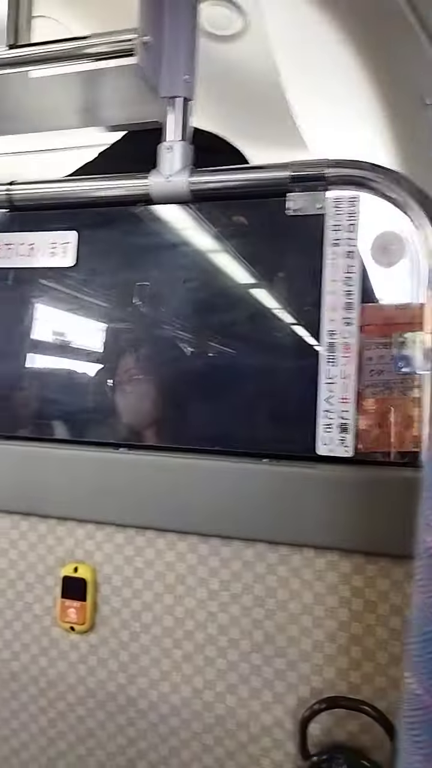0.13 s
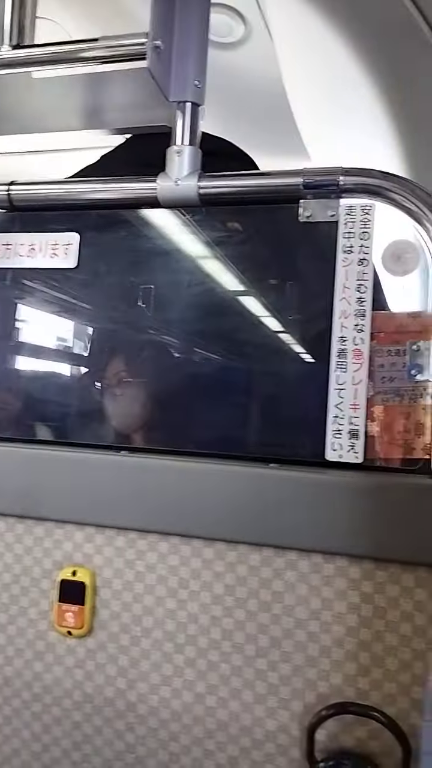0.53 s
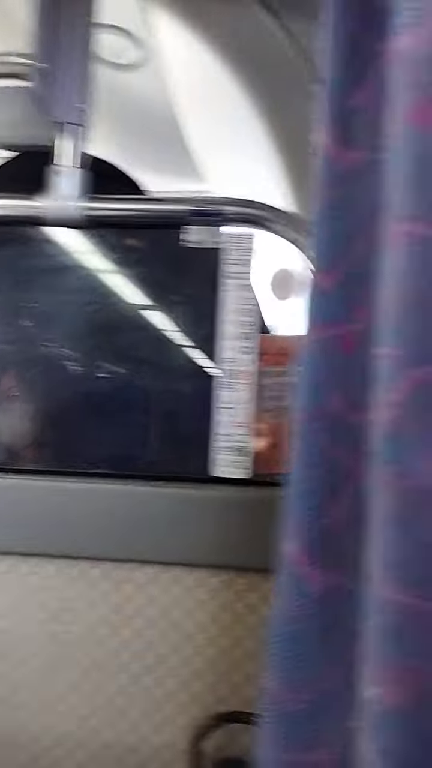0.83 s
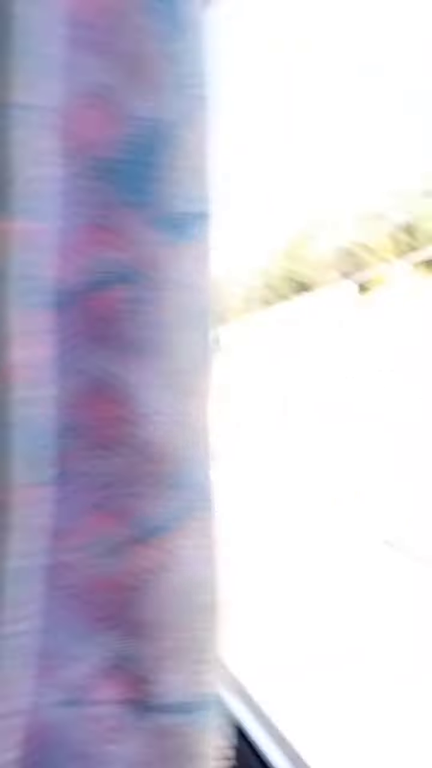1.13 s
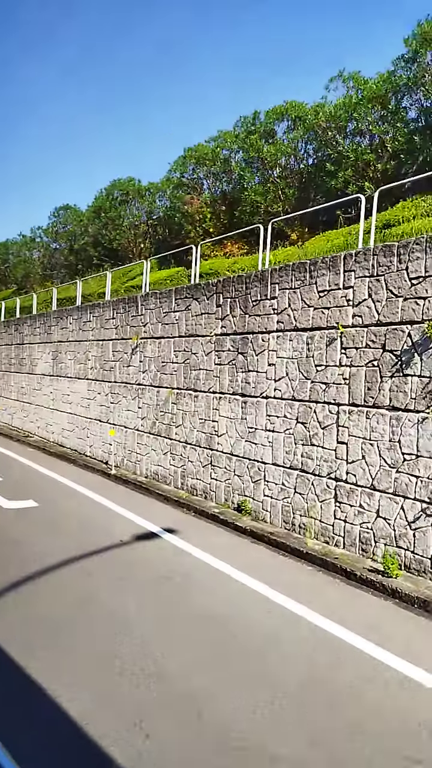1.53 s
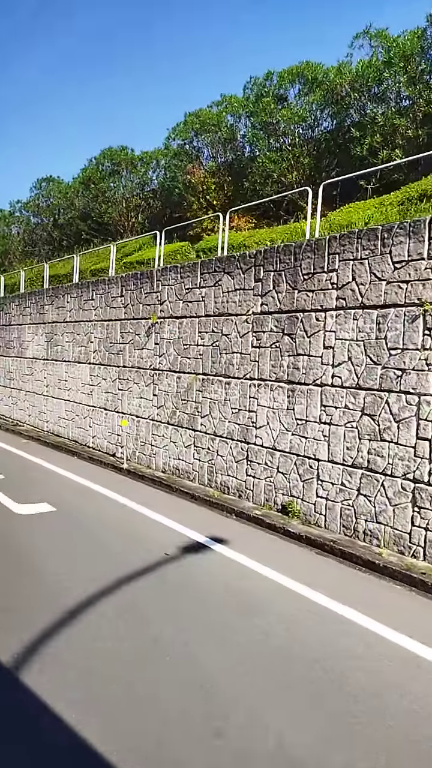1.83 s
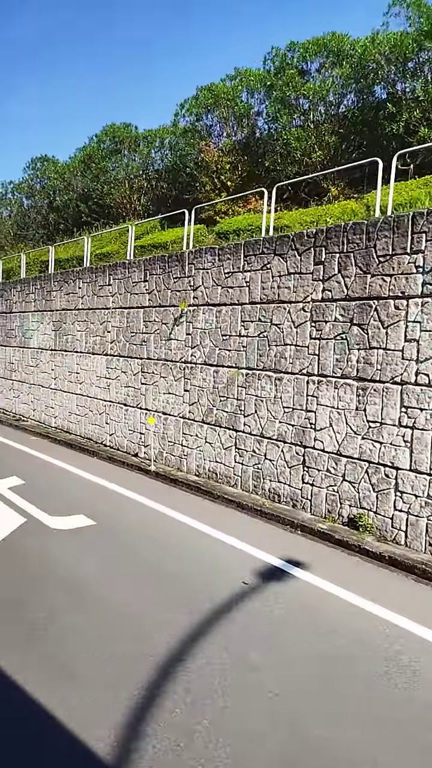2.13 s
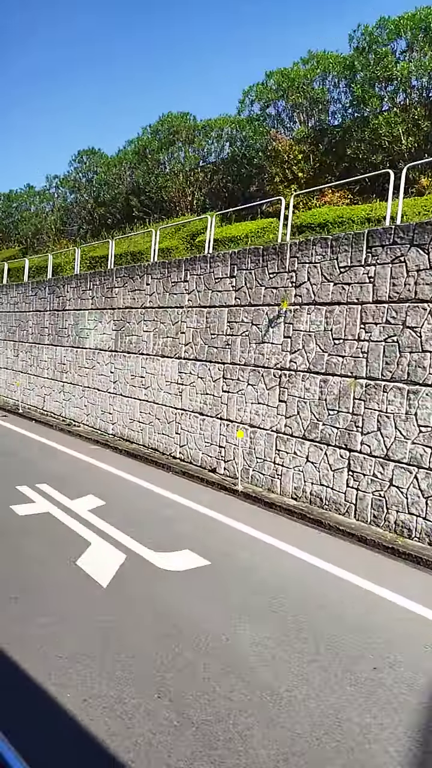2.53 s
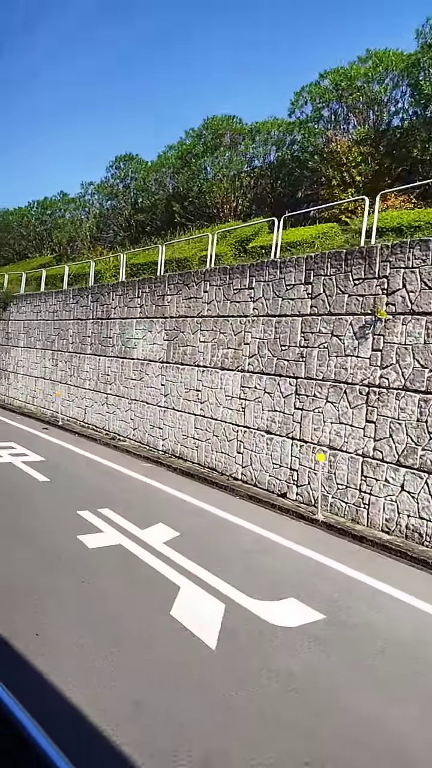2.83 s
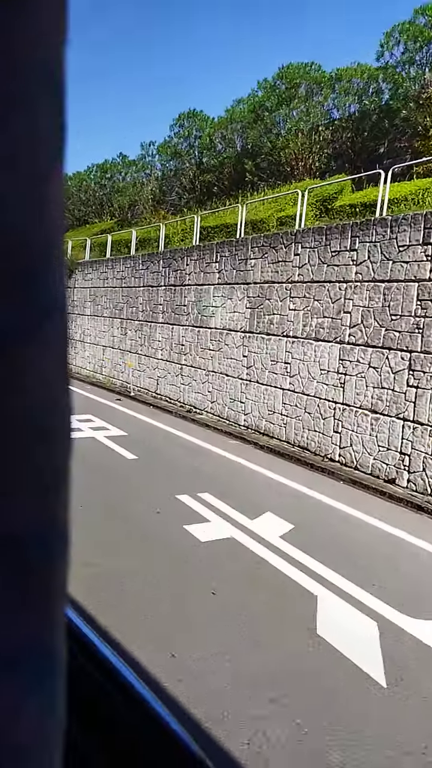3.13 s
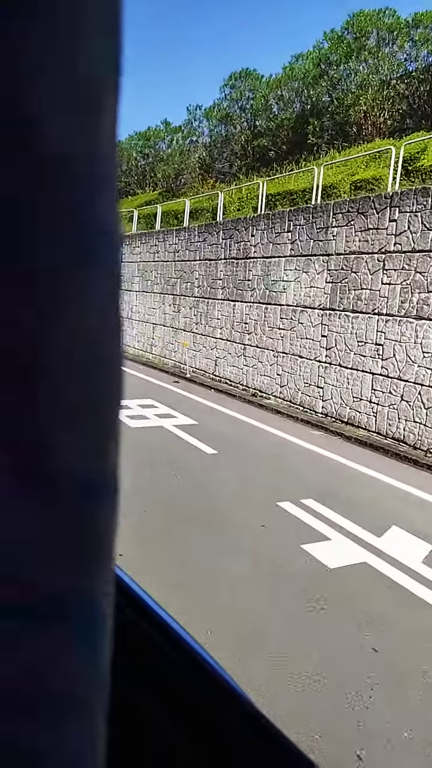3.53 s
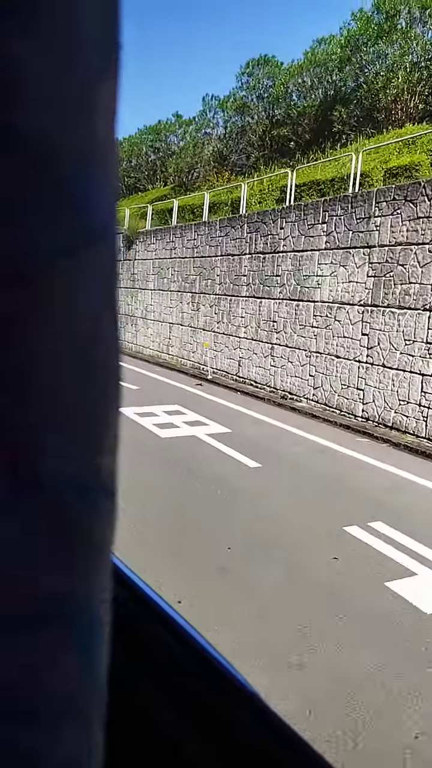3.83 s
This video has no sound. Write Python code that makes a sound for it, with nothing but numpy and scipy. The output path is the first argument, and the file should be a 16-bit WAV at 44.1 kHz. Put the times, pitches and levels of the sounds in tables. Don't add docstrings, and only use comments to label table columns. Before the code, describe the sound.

A bus engine and road noise rumble inside the cabin, heard from a seat; heavy low shudder and trim rattles cluster early, then fewer dry ticks, with a faint regular relay tick throughout.

```python
import sys
import numpy as np
from scipy import signal
from scipy.fft import rfft, irfft
from scipy.io import wavfile
from scipy.ndimage import uniform_filter1d, minimum_filter1d

SR = 44100
rng = np.random.default_rng(int(sys.argv[2]) if len(sys.argv) > 2 else 0)


def amp(db):
    return 10 ** (np.asarray(db, float) / 20)


def write(x):
    x = np.atleast_2d(x).T
    wavfile.write(sys.argv[1], SR, np.round(np.clip(x, -1, 1) * 32767).astype(np.int16))


N = 176400


def evened(x):
    return x / np.sqrt(np.mean(x ** 2) + 1e-20)


def read(points, hz):
    f, value = np.transpose(points)
    return np.interp(np.log(hz + 1), np.log(f + 1), value)


def curve(rows, t):
    s, db = np.transpose(rows)
    return np.interp(t, s, db)


def slow(rate_hz):
    f = np.fft.rfftfreq(N, 1 / SR)
    return evened(irfft(rfft(rng.standard_normal(N)) * np.exp(-(f / rate_hz) ** 2), N))


def coloured(x, colour, top_db=0.):
    hz = np.fft.rfftfreq(256, 1 / SR)
    treble_db = top_db * np.clip((hz - 9500) / 2000, 0, 1)
    taps = np.roll(irfft(amp(read(colour, hz) + treble_db)), 128) * np.hanning(256)
    return signal.oaconvolve(x, taps[None], "same", axes=1)


def cabin(x):
    t, t60_s = np.arange(6000) / SR, .06
    sparse = rng.standard_normal((2, 6000)) * (rng.random((2, 6000)) < .05)
    taps = sparse * amp(-60 * t / t60_s) * (t > .002)
    taps = taps / np.linalg.norm(taps, axis=1, keepdims=True)
    return signal.fftconvolve(x, taps, axes=1)[:, :N]


def ring(modes, detune, rise_s=0.000079):
    t = np.arange(3000) / SR
    total = np.zeros(3000)
    for (hz, db, t60_s), shift in zip(modes, detune):
        total += amp(db - 60 * t / t60_s) * np.sin(2 * np.pi * hz * (1 + shift) * t)
    return np.minimum(t / rise_s, 1) * total


# (start_s, level_db)
ROAD_LOAD = [
    (0.05, -31),
    (0.16, -32),
    (3.95, -35),
]
# (pitch_hz, share 0-1)
PORT_COHERENCE = [(20, 0.92), (60, 1), (130, 0.97), (290, 0.94), (600, 0.1), (1400, 0.18), (4000, 0.42),
                  (15000, 0.3)]


def ports(colour_db, size, patchy_db, flicker_db, load):
    hop = size // 4
    frames, hz = N // hop + 5, np.fft.rfftfreq(size, 1 / SR)
    a, b, c, d, patch = rng.standard_normal((frames, len(hz), 5)).T
    patch = evened(uniform_filter1d(uniform_filter1d(patch, size=8, axis=0), size=10, axis=1))
    flicker = evened(uniform_filter1d(rng.standard_normal(frames), size=6))
    load_db = curve(ROAD_LOAD, np.arange(frames) * hop / SR)
    load_db = load * (load_db - load_db.mean())
    same = np.clip(read(PORT_COHERENCE, hz), 0, 1)[:, None]
    late = np.exp(-2j * np.pi * hz * 0.0003 * hz / (hz + 250))[:, None]
    right = a + 1j * b
    left = same * late * right + np.sqrt(1 - same ** 2) * (c + 1j * d)
    gain_db = colour_db(hz)[:, None] + patchy_db * patch + flicker_db * flicker + load_db
    z = np.array([left, right]) * amp(gain_db)
    return evened(signal.istft(z, nperseg=size, noverlap=size - hop)[1][:, :N])


# (pitch_hz, level_db per Hz)
HISS_SPECTRUM = [(240, -30.5), (400, -18.5), (757, -14), (1210, -4), (4120, -20.5), (7440, -26),
                 (8420, -33), (15200, -35), (16400, -53)]


def hiss():
    def colour_db(hz):
        glass_db = 3 / (1 + ((hz - 2150) / 300) ** 2)
        return read(HISS_SPECTRUM, hz) + glass_db - 40 * (hz < 420)
    return amp(-49.5) * ports(colour_db, size=512, patchy_db=1.36, flicker_db=.7, load=0.51)


# (pitch_hz, level_db per Hz)
DRONE_SPECTRUM = [(25, -0.5), (46, -7.5), (100, -9.5), (200, -19.5), (260, -24), (450, -29), (700, -34.5),
                  (1500, -46)]
# (pitch_hz, width_hz, lift_db)
PANEL_BOOMS = [
    (30.8, 7.2, 0),
    (60.7, 2.2, 17),
    (75.8, 20.6, 6.5),
    (127.5, 7.4, 2.5),
    (167, 33.6, 6),
    (288.6, 15.8, 8),
    (322.4, 11.3, 5),
    (594, 11, 3.5),
]


def drone():
    def colour_db(hz):
        lift_db = sum(db / (1 + ((hz - f) / (width / 2)) ** 2) for f, width, db in PANEL_BOOMS)
        return read(DRONE_SPECTRUM, hz) + lift_db - 60 * (hz < 18) - 40 * (hz > 2000)
    return amp(-26.5) * ports(colour_db, size=4096, patchy_db=1.5, flicker_db=0.86, load=0.95)


# (start_s, level_db)
CHATTER_LEVEL = [(.05, -57.5), (.4, -56), (.9, -64), (1.15, -66), (1.35, -55.5), (1.62, -60.5), (1.78, -77),
                 (2.5, -76), (2.65, -56.5), (2.85, -57.5), (3.1, -57.5), (3.28, -62.5), (3.42, -70),
                 (3.8, -78), (3.9, -55.5), (3.98, -63)]
# (pitch_hz, level_db per Hz)
RUSTLE_SPECTRUM = [(2000, -17), (4000, -4), (6000, -1), (7200, 1), (8200, -6.5), (11000, -6.5), (15500, -6)]


def chatter():
    contacts_per_s, spread_db = 2500, 4
    size = amp(spread_db * np.minimum(rng.exponential(1, (2, N)), 5))
    size = size * (rng.random((2, N)) < contacts_per_s / SR)
    size = size * rng.choice([-1., 1.], (2, N))
    crossed = .5 * np.roll(size[::-1], 17, axis=1)
    rustle = coloured(size + crossed, RUSTLE_SPECTRUM)
    rustle = rustle + cabin(rustle)
    level_db = curve(CHATTER_LEVEL, np.arange(N) / SR) + 0.5
    return evened(rustle) * amp(level_db + 2.5 * slow(rate_hz=18))


# (pitch_hz, level_db, t60_s)
CLOSING_MODES = [(2070, -57, .05), (3070, -68, .04), (2160, -59, .04)]
# (pitch_hz, level_db, t60_s)
OPENING_MODES = [(2070, -55, .05), (840, -55, .06), (2140, -59, .04)]
RELAY_STRENGTH = [14, 18, 19, 19, 18, 19, 14, 18, 12, 14]


def relay():
    first_s, every_s = .208, .4015
    out = np.zeros(N + 3000)
    for k, luck in enumerate(rng.random((10, 4))):
        at = round((first_s + k * every_s) * SR)
        modes = (CLOSING_MODES, OPENING_MODES)[k % 2]
        tick = ring(modes, 0.0041 * (luck[:3] - .5), rise_s=.005)
        out[at:at + 3000] += amp(RELAY_STRENGTH[k]) * tick
    return np.array([np.roll(out, 14), out])[:, :N]


# (pitch_hz, level_db, t60_s)
TRIM_MODES = [(6900, -25, .05), (7250, -26, .04)]


def knocks(rows, colour, snap_s, ring_db, bright_db, scuff_db):
    out, t = np.zeros((2, N + 6000)), np.arange(400) / SR
    luck, grit = rng.random((len(rows), 3)), rng.standard_normal((len(rows), 400))
    decay = np.exp(-t / snap_s) + amp(scuff_db) * np.exp(-t / .0035)
    for (s, db, top_db, pan_db), u, g in zip(rows, luck, grit):
        burst = np.pad(g * decay, (150, 2450))
        click = coloured(burst[None], colour, top_db + bright_db)[0]
        click = click / np.sqrt(2 * uniform_filter1d(click ** 2, size=30).max())
        tone = np.roll(ring(TRIM_MODES, 0.08 * (u[:2] - .5), 0.00046), 150)
        hit = click + amp(ring_db + 8 * (u[2] - .5)) * tone
        for ear, lag, side in ((0, 8, 1), (1, -8, -1)):
            k = round(s * SR) + lag - 150
            out[ear, k:k + len(hit)] += amp(db + 4 + side * pan_db / 2) * hit
    return out[:, :N]


# (start_s, peak_db, treble_db, left_right_db)
DRY_TICKS = [(1.614, -54, -10, 0), (1.6156, -54, -12, -3), (1.8141, -36, -7, -10), (2.0164, -48, -7, -7),
             (2.0856, -45, -5, -12), (2.8004, -40, -8, -3), (2.805, -52, -7, 2), (2.8112, -52, -10, 5),
             (2.8872, -51, -13, 13), (2.8906, -51, -7, 10), (2.8942, -49, -10, 5), (2.9304, -50, -9, 11),
             (2.9377, -50, -14, 8), (2.992, -50, -8, 9), (3.0044, -50, -9, 10), (3.0569, -43, -14, -8),
             (3.1846, -52, -6, 9), (3.1902, -52, -4, 10), (3.1961, -44, -9, 13), (3.2039, -46, -12, 13),
             (3.2541, -51, -10, 9), (3.2638, -50, -13, 9), (3.2956, -53, -18, 15), (3.6188, -49, -10, -5),
             (3.8736, -46, -10, 5), (3.877, -49, -6, 2), (3.917, -52, -9, 5), (3.9274, -54, -4, 4),
             (3.9349, -54, -6, 3)]
# (pitch_hz, level_db per Hz)
TICK_SPECTRUM = [(2000, -20), (4300, -9), (5500, -8), (6900, 0), (8500, -6), (12000, -9), (16000, -11)]


def ticks():
    return knocks(DRY_TICKS, TICK_SPECTRUM, snap_s=.0002, ring_db=0., bright_db=6, scuff_db=-17)


# (start_s, peak_db, treble_db, left_right_db)
TRIM_RATTLES = [(0.0037, -44, -8, 18), (0.0481, -40, -18, -8), (0.0535, -32, -3, -11),
                (0.0971, -36, -8, -8), (0.1003, -42, -4, -9), (0.1038, -39, -7, -12),
                (0.1091, -42, -7, -10), (0.1107, -48, -16, 0), (0.1189, -48, -12, -7),
                (0.1211, -49, -10, -3), (0.1262, -49, -10, -8), (0.1314, -50, -10, -5),
                (0.2088, -49, -8, -1), (0.2121, -34, -14, -4), (0.2614, -39, -7, -5), (0.264, -41, -9, -7),
                (0.2677, -47, -11, -7), (0.3112, -39, -9, -11), (0.3582, -46, -11, -6),
                (0.3616, -35, -8, -6), (0.39, -50, -8, -6), (0.4539, -38, -8, -2), (0.5798, -46, -9, 2),
                (0.5829, -51, -11, 2), (0.588, -38, -18, -6), (0.5897, -45, -14, -5),
                (0.5929, -45, -11, -8), (0.7419, -47, -4, -9), (0.7464, -36, -8, -7), (0.7518, -46, -11, 2),
                (0.7547, -47, -9, -3), (0.7593, -42, -15, -3), (1.0499, -56, -12, 1),
                (1.0536, -54, -15, -3), (1.0597, -53, -12, -3), (1.1224, -43, -16, -5),
                (1.2336, -53, -11, -4), (1.2485, -49, -8, -5), (1.2525, -42, -13, -6),
                (1.2546, -38, -12, -7), (1.2568, -42, -11, -10), (1.2586, -43, -11, -6),
                (1.2617, -47, -9, -3), (1.2657, -47, -10, -8), (1.2711, -45, -10, -4),
                (1.2777, -49, -13, -8), (1.3197, -45, -13, -3), (1.3248, -38, -16, -8),
                (1.3583, -49, -10, 1), (1.3706, -49, -17, -5)]
# (pitch_hz, level_db per Hz)
KNOCK_SPECTRUM = [(1500, -28), (3600, -5), (5300, -9), (6900, -1), (8300, -7), (10500, -14), (14200, -11),
                  (16000, -12)]


def rattles():
    return knocks(TRIM_RATTLES, KNOCK_SPECTRUM, snap_s=.0005, ring_db=3., bright_db=8, scuff_db=-11)


# (pitch_hz, rms_db, waver_share)
FIRING_ORDERS = [(59.87, -35.5, 0.0486), (124.2, -40, 0.01772)]
# (start_s, level_db)
ENGINE_EFFORT = [(0.05, -40), (0.77, -39.5), (1.55, -33.5), (2.03, -41), (2.06, -33.5), (2.95, -39.5),
                 (2.99, -44), (3.09, -24.5), (3.16, -30), (3.21, -48), (3.39, -33.5), (3.47, -52),
                 (3.58, -33.5), (3.95, -38)]


def engine():
    effort_db = curve(ENGINE_EFFORT, np.arange(N) / SR)
    effort_db = effort_db - effort_db.mean()
    total = np.zeros(N)
    for k, (hz, db, share) in enumerate(FIRING_ORDERS):
        level = amp(db + 3.0 + 2 * slow(rate_hz=10.0) + k * effort_db)
        pitch_hz = hz * (1 + share * slow(rate_hz=4.606))
        total += level * np.sin(2 * np.pi * np.cumsum(pitch_hz) / SR)
    return total


# (start_s, pitch_hz, peak_db)
BODY_SWING = [(0.0, 10.57, -2.0), (0.2, 10.84, -5.8), (0.4, 12.14, -4.2), (0.55, 10.66, -13.6),
              (0.72, 12.45, -6.4), (0.9, 10.91, -9.8), (1.15, 11.0, -32.3), (1.3, 12.03, -5.5),
              (1.5, 11.34, -3.1), (1.7, 10.42, -13.8), (1.95, 20.6, -46.0), (2.15, 19.45, -23.0),
              (2.3, 11.84, -18.7), (2.6, 17.02, -28.2), (2.95, 12.38, -31.4), (3.2, 11.06, -17.9),
              (3.55, 11.28, -17.1), (4.0, 10.75, -18.7)]


def shake():
    t, first_crest_s = np.arange(N) / SR, .0107
    s, hz, db = np.transpose(BODY_SWING)
    turns = np.cumsum(np.interp(t, s, hz)) / SR
    turns = turns - turns[round(first_crest_s * SR)]
    swing = np.interp(t, s, amp(db + .2)) * np.cos(2 * np.pi * turns)
    f = np.fft.rfftfreq(N, 1 / SR)
    band = np.exp(-((f - 15.9) / 6) ** 2)
    heave = irfft(rfft(rng.standard_normal(N)) * band, N)
    return swing + amp(-25.5) * evened(heave)


def scene():
    hits = rattles() + ticks() + relay()
    low = shake() + engine()
    late = np.r_[np.full(14, low[0]), low[:-14]]
    body = np.array([late, low])
    return body + drone() + hiss() + chatter() + hits + amp(-12) * cabin(hits)


def thin_treble(x):
    hz, t, z = signal.stft(x, SR, nperseg=1536, noverlap=1024, boundary="even")
    power = abs(z) ** 2
    shake_db = 10 * np.log10(uniform_filter1d(power[0, :2].sum(0), size=5))
    wander = evened(uniform_filter1d(rng.standard_normal(len(t)), size=5))
    starved = .5 * wander + np.clip((shake_db + 20) / 14, -.2, .6)
    patch = uniform_filter1d(rng.standard_normal(z.shape[1:]), size=12, axis=0)
    patch = evened(uniform_filter1d(patch, size=3, axis=1))
    top = power[:, hz > 4000].sum((0, 1))
    calm = top < 3 * minimum_filter1d(top, size=9)
    depth = np.clip(starved + patch + hz[:, None] / 9000 - .7, 0, 2)
    bar = .9 * depth * calm * (hz[:, None] > 2400)
    weak = power < bar * uniform_filter1d(power, size=15, axis=1)
    return signal.istft(np.where(weak, .02 * z, z), SR, nperseg=1536, noverlap=1024)[1][:, :N]


def band_limit(x):
    return signal.sosfilt(signal.butter(12, 16580, fs=SR, output="sos"), x)


def record(dry):
    limit, edge_hz = 3.3, 15950
    soft = dry / (1 + (abs(dry) / limit) ** 6) ** (1 / 6)
    padded = np.pad(soft, ((0, 0), (300, 300)), "edge")
    taps = signal.firwin(501, edge_hz, window=("kaiser", 7), fs=SR)
    cut = signal.oaconvolve(padded, taps[None], "same", axes=1)
    finished = thin_treble(cut[:, 300:-300])
    return band_limit(finished)


dry = scene()
out = record(dry)
write(out)
```